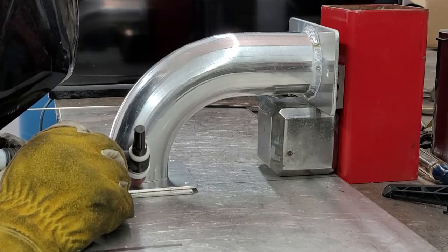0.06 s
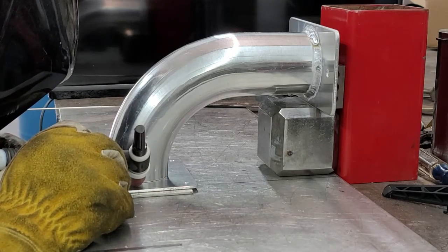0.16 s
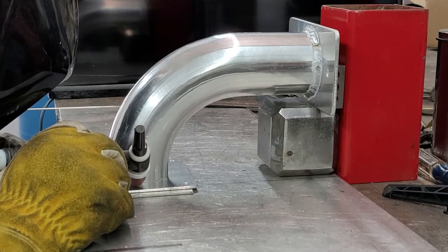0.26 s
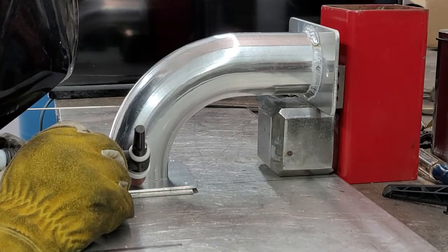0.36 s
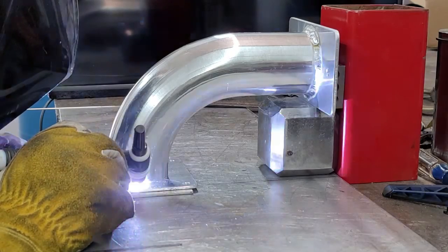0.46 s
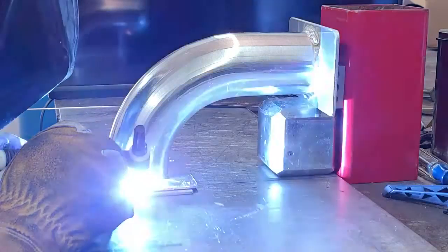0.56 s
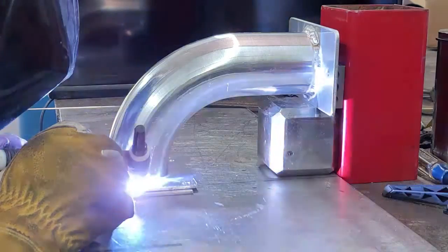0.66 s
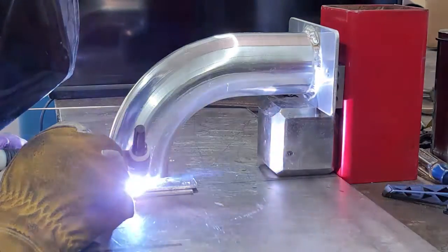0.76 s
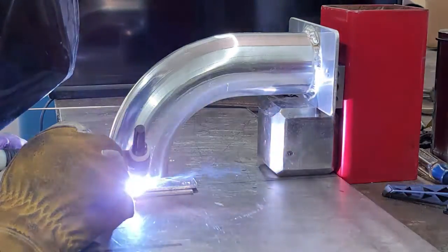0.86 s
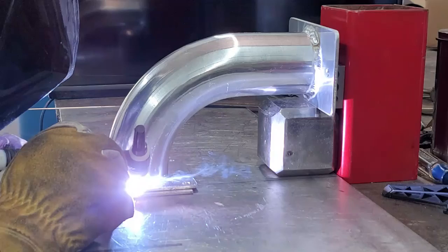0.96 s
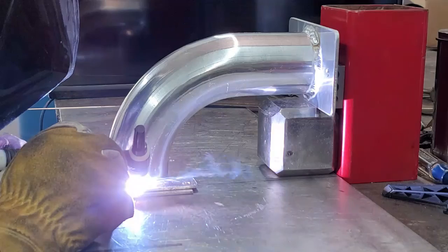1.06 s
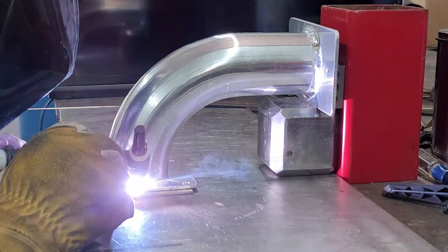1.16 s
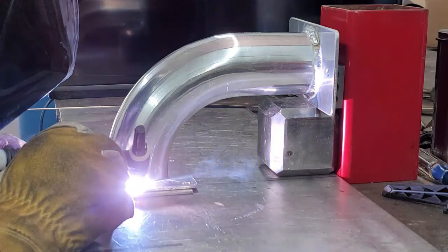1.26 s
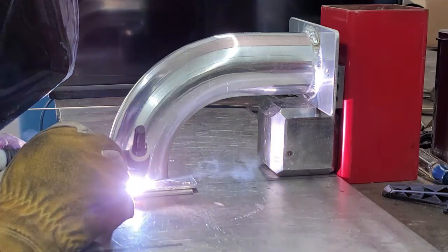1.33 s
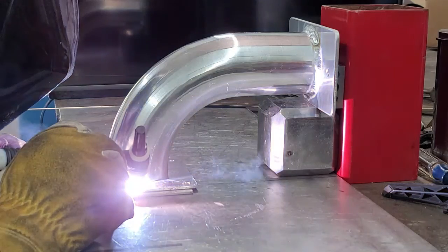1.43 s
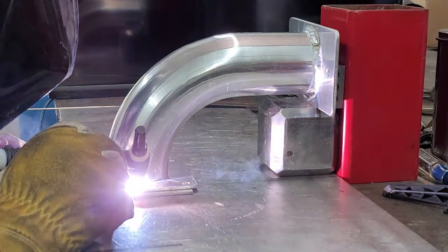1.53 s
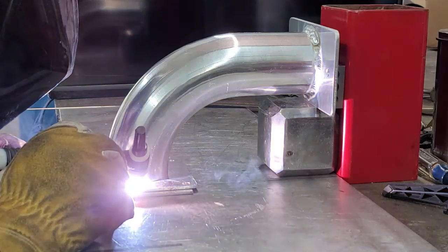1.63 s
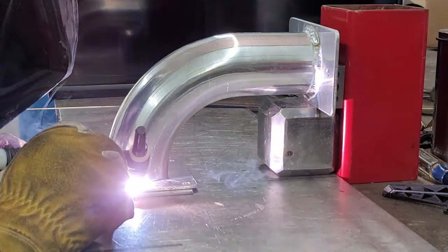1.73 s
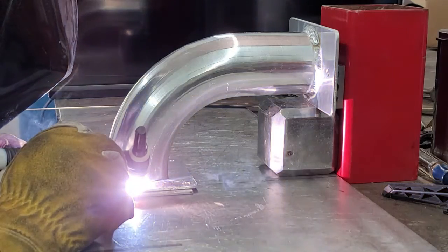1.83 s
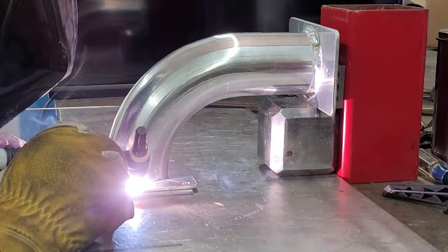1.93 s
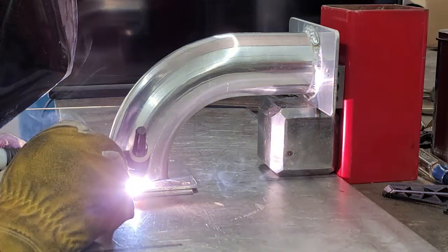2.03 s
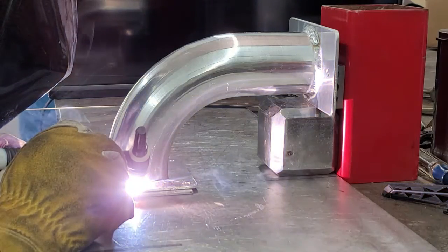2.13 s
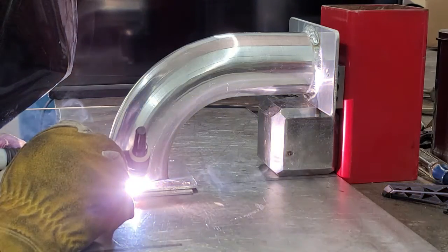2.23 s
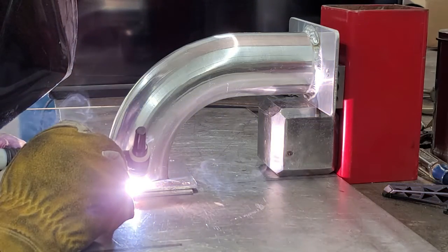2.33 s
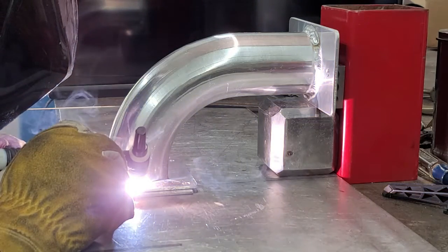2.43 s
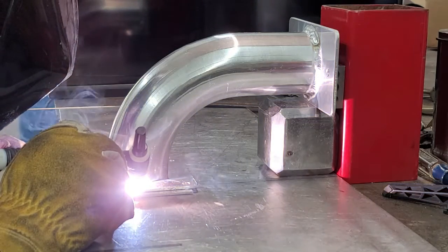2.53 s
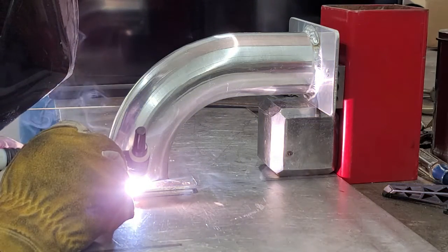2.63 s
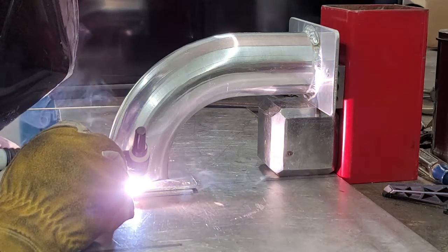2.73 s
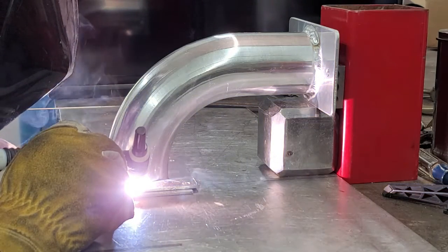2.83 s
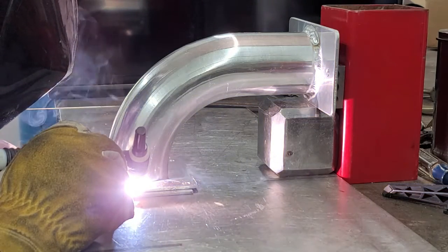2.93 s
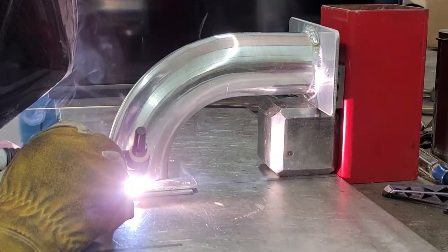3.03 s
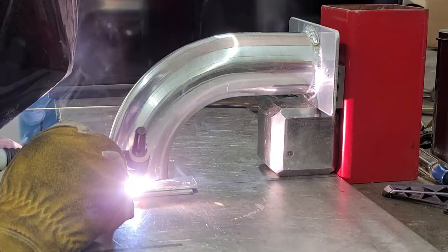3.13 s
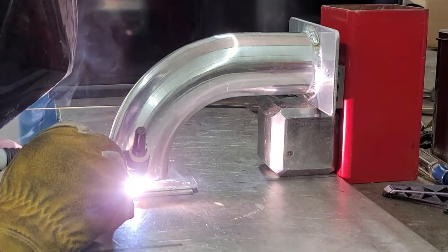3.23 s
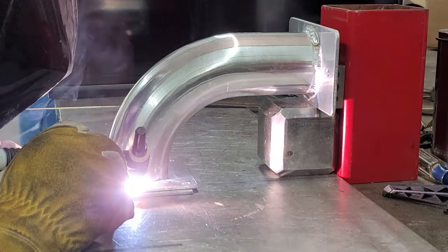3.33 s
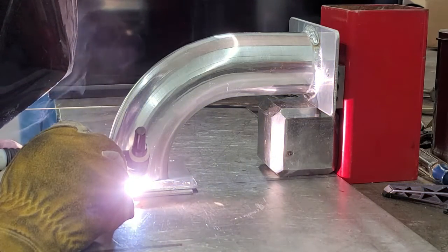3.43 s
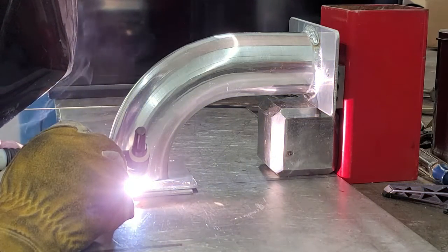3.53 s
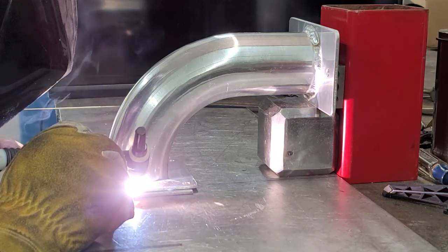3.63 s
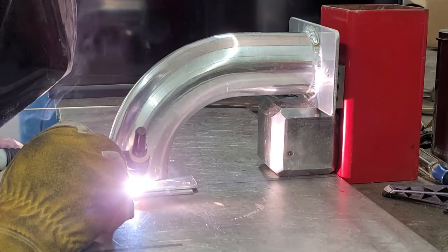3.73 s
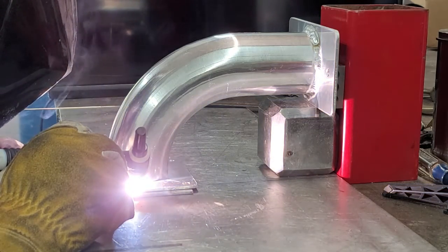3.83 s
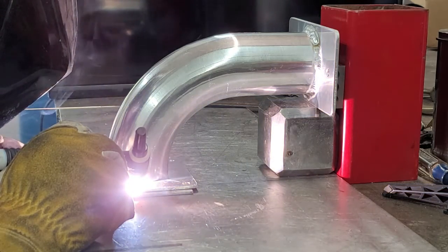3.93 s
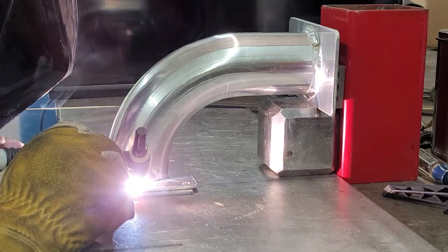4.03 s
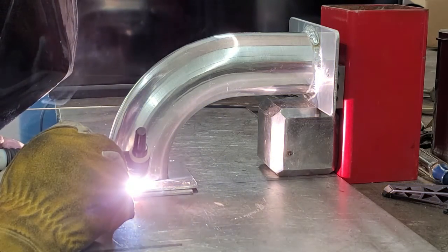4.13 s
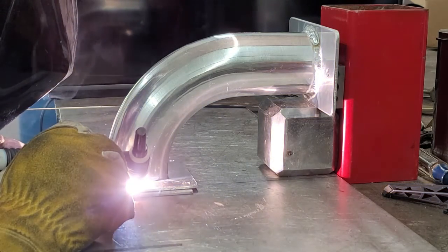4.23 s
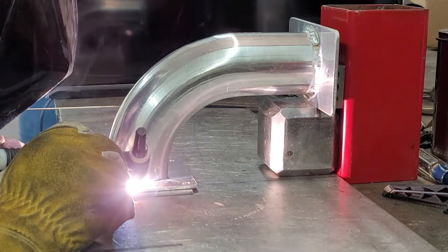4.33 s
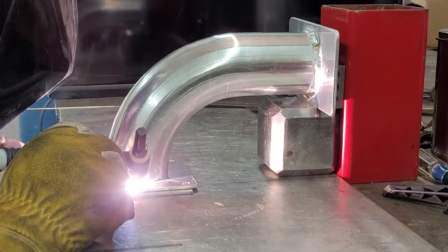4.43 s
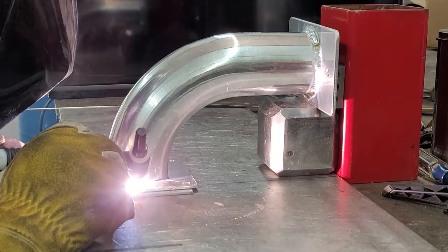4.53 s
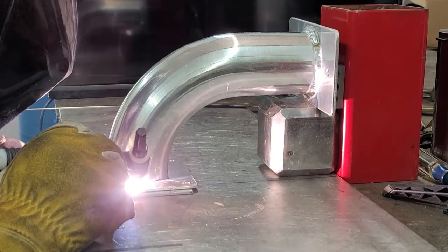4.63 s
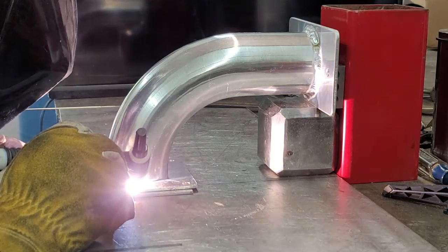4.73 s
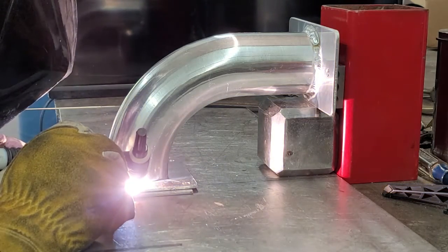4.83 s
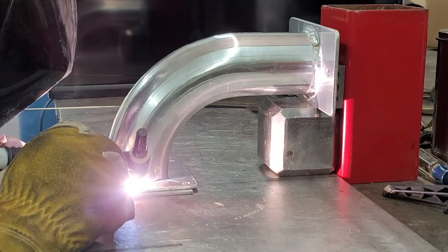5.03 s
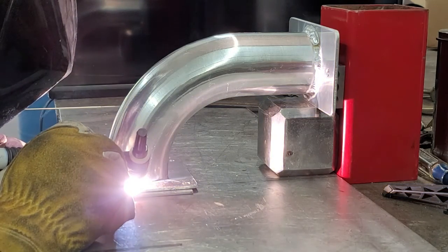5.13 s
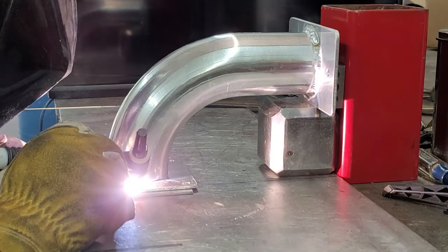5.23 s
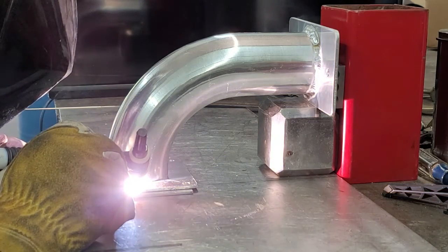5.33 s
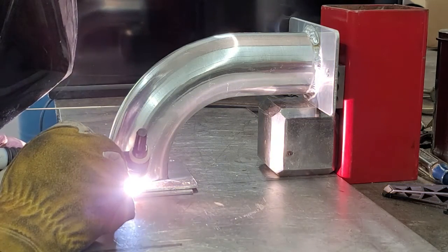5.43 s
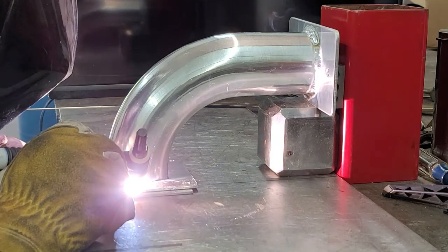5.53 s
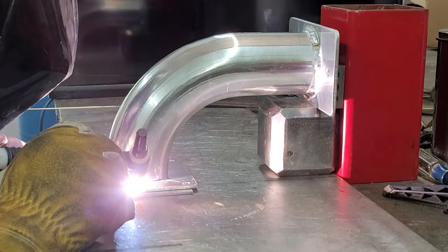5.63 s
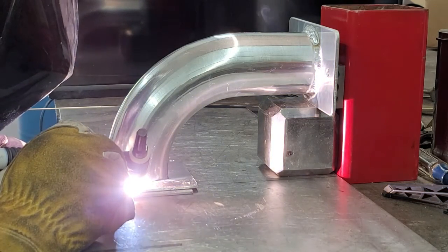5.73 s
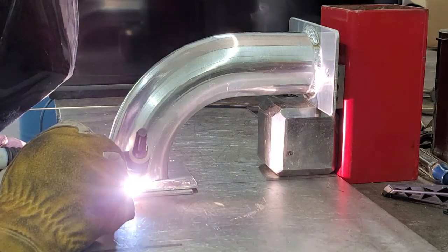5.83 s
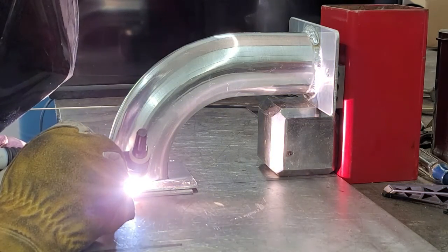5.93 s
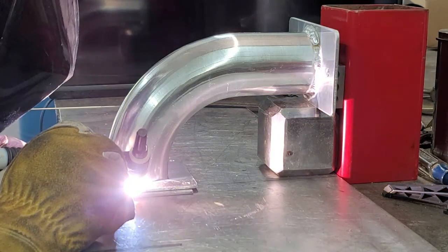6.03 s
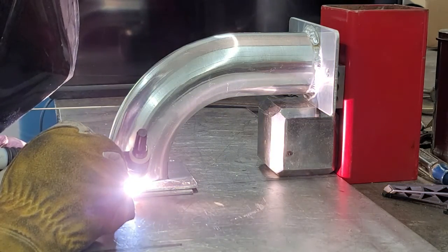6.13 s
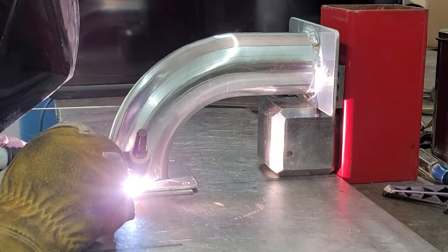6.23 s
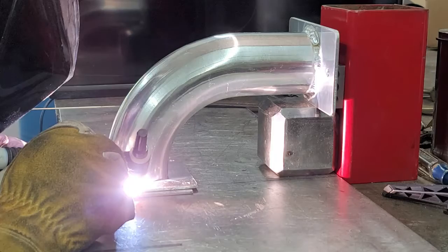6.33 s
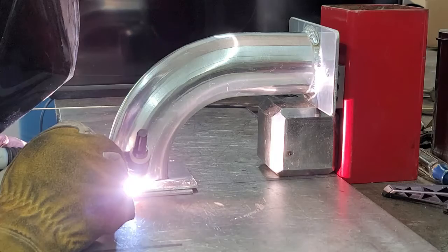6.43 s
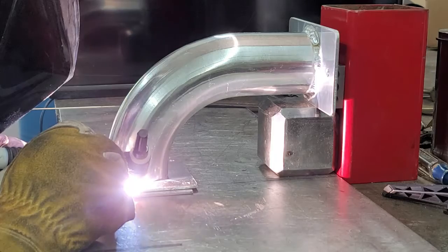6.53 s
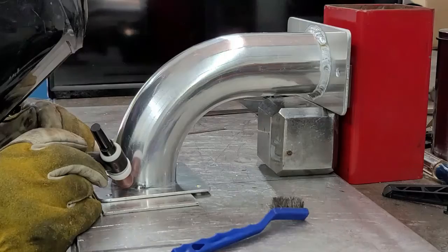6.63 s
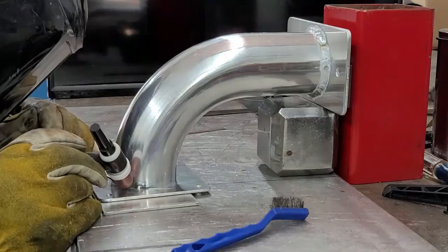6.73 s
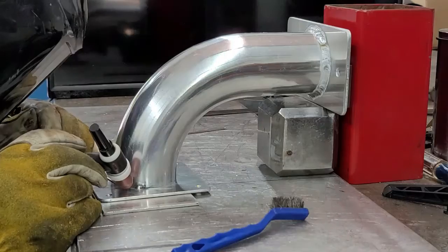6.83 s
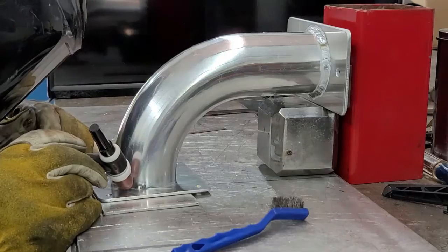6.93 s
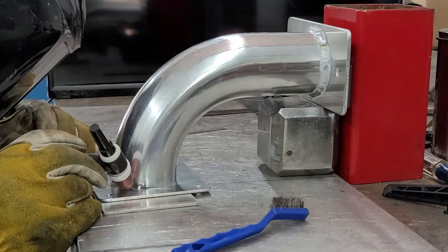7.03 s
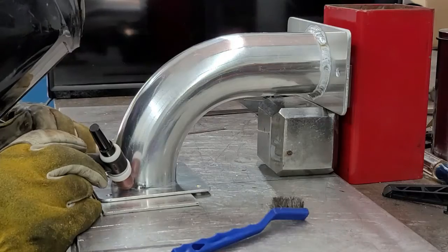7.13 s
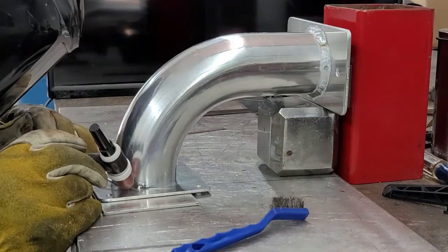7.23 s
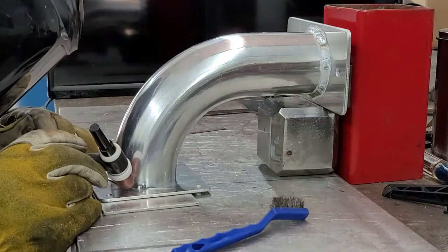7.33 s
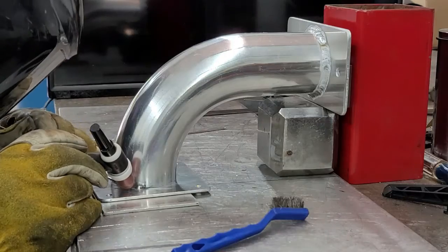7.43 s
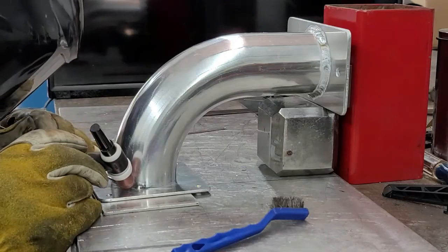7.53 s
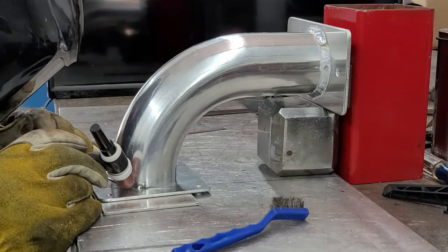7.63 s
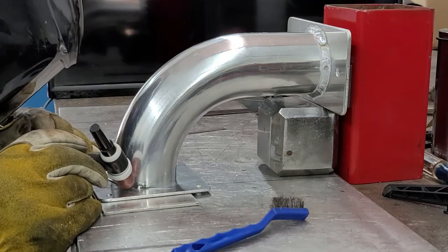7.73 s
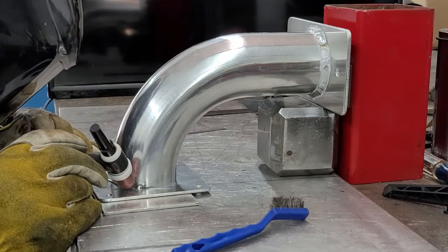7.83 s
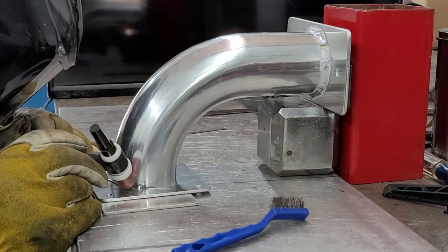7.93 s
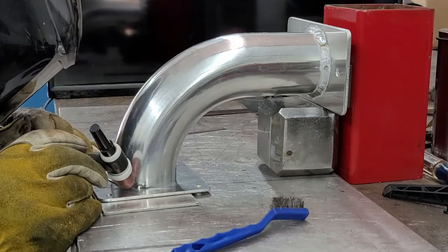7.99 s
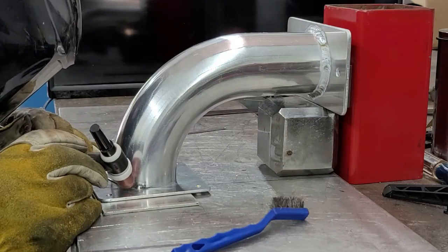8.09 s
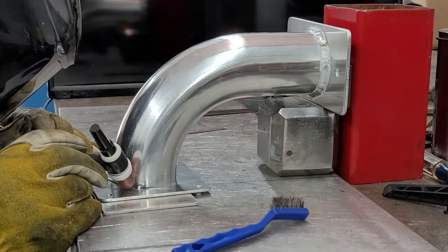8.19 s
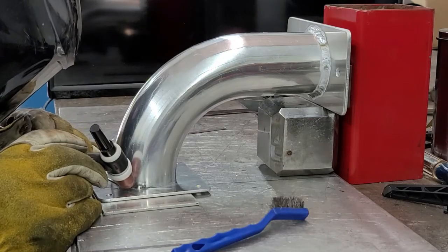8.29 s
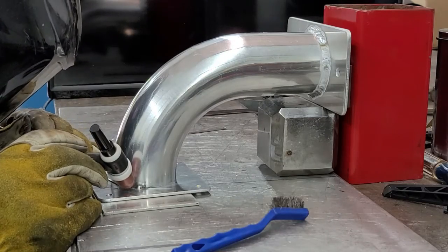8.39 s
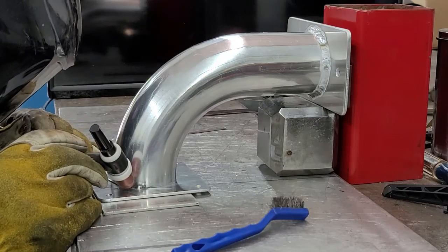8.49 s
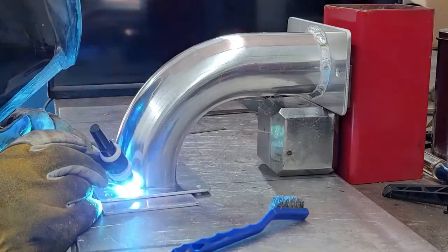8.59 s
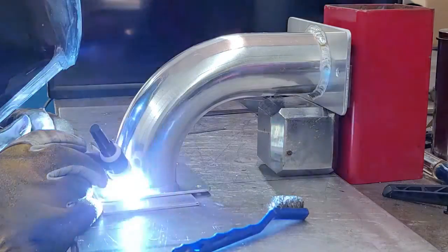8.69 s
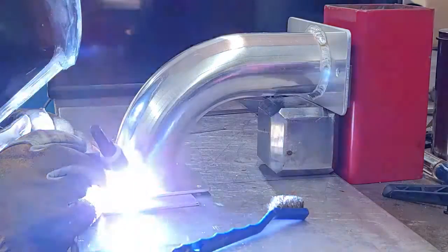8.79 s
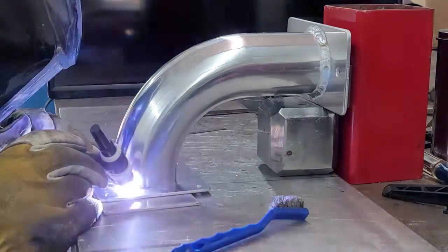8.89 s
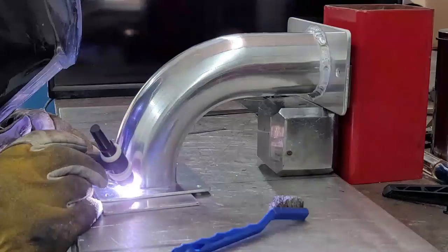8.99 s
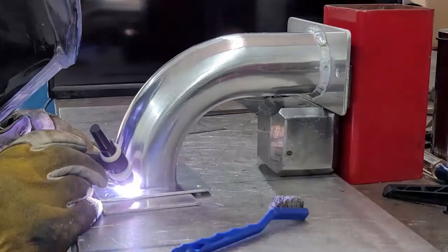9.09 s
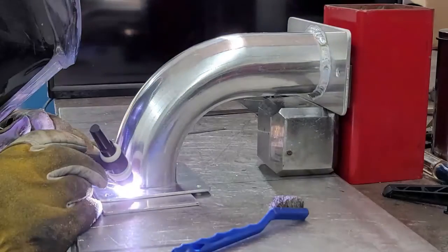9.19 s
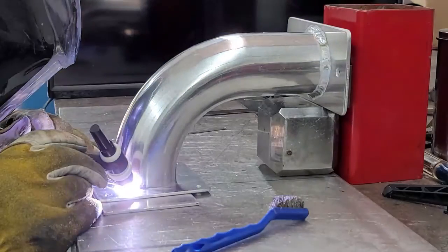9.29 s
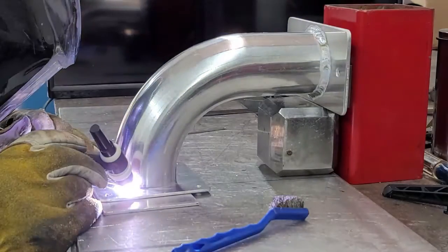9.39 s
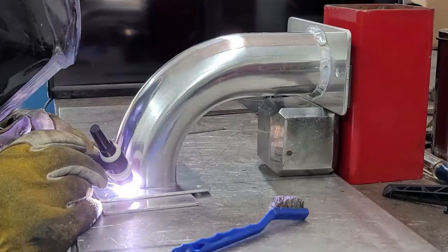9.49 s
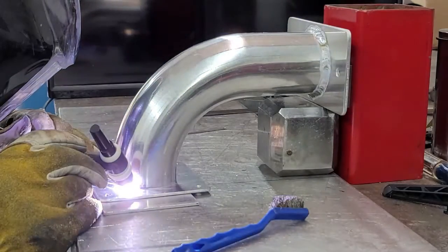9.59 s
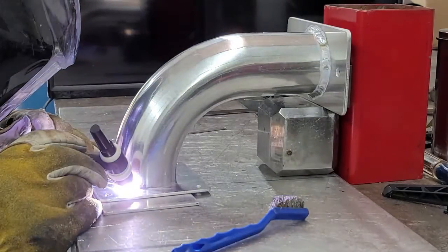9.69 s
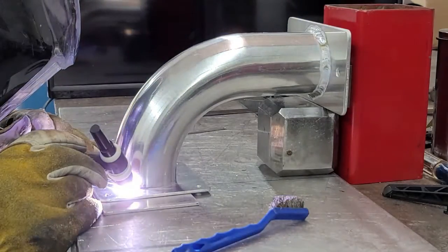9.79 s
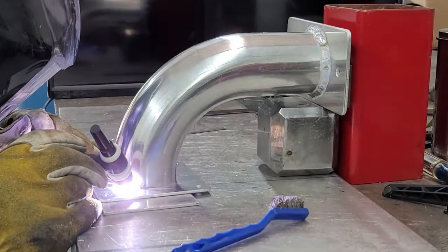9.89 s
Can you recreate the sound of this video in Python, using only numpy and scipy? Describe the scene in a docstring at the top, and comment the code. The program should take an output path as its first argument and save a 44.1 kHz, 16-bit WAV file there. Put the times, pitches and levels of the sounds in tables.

```python
"""Metal shop, at the bench: an AC welding arc, struck twice. A trigger clicks, the gas valve clacks,
the arc crackles alight, then snaps at both current reversals of each cycle; bench and pipe echo it.
A vehicle drones past outside. At 6.7 s weld and drone cut off; cooling metal ticks in the quiet shop
before the second strike."""
import sys
import numpy as np
from scipy import signal
from scipy.fft import rfft, irfft, next_fast_len
from scipy.io import wavfile
from scipy.ndimage import uniform_filter1d

SR = 44100
rng = np.random.default_rng(int(sys.argv[2]) if len(sys.argv) > 2 else 0)


def wav_out(sig):
    """Save sig, one row per channel (or a flat mono array), as 16-bit PCM at SR to the path in sys.argv[1]."""
    wavfile.write(sys.argv[1], SR, np.round(np.clip(np.atleast_2d(sig).T, -1, 1) * 32767).astype(np.int16))


N = 438794

# quiet shop spectrum: freq_hz, gain_db
ROOM_EQ = [(55, -32.5), (105, 0.5), (184, -8.5), (300, -17.5), (440, -22.5), (1040, -24.5), (2100, -36),
           (4000, -44), (7200, -48), (9000, -54), (16000, -51)]
# brief hums: start_s, end_s, pitch_hz, level_db
HUMS = [(2.593, 4.05, 187.5, -55), (2.7, 4.1, 154.3, -57)]
# traffic rumble: time_s, level_db
RUMBLE = [(0, -47), (.3, -37), (.75, -41.5), (2.5, -48), (5.1, -44), (6.68, -46), (6.72, -55), (8.35, -59),
          (8.65, -48), (8.9, -53.5), (9.95, -61)]
# traffic noise: time_s, murmur_db, road_db
ROAD = [(0, -46.5, -67), (.4, -45.5, -71), (.8, -67, -74), (2.5, -59.5, -72), (2.9, -56.5, -77),
        (4.3, -64, -65.5), (5.9, -56.5, -62.5), (6.55, -52.5, -50), (6.68, -52.5, -64)]
# engine pitch: time_s, pitch_hz
ENGINE_PITCH = [(0, 135), (.46, 130), (.6, 113), (1.6, 104), (2.4, 113), (4.3, 112), (5.3, 106), (5.6, 94),
                (6.2, 92), (6.67, 85)]
# engine level: time_s, level_db
ENGINE_LEVEL = [(0, -46), (.25, -35.5), (.46, -45.5), (.59, -36.5), (.7, -43), (1.49, -41), (1.75, -58),
                (2.5, -46), (3.83, -54), (4.14, -34), (4.38, -42.5), (4.6, -55.5), (4.85, -51), (5.1, -37),
                (5.3, -43.5), (5.55, -31), (5.8, -37), (6.67, -39)]
# cooling ticks: start_s, level_db, treble_tilt_db
TICKS = [(6.967, -72, 5), (7.036, -56, -7), (7.32, -57, 9), (7.662, -76.5, 9)]
# modes of the cooling metal: freq_hz, gain_db, t60_s
METAL_MODES = [(1500, 6, 0.061), (2440, -3, 0.15), (4630, -2, 0.061), (5300, 1, .18), (6700, 7.5, 0.077),
               (7240, -1, 0.17), (9500, -7, .15), (11900, -9.5, .06)]
# weld starts: trigger_s, trigger_db, valve_s, valve_db, gas_db
STARTS = [(0.07, -41.5, .11, -22, -30.5), (8.2083, -48, 8.252, -29.5, -37.5)]
# gas hiss spectrum: freq_hz, gain_db
GAS_EQ = [(290, -46.5), (500, -9), (974, -14), (1740, -3), (2330, -11.5), (3020, -9.5), (4470, -14),
          (7100, -8), (10100, -21.5), (12100, -13.5), (16000, -32.5)]
# starting arc hiss: start_s, level_db, rise_db_per_s
PILOT = [(0.523, -43, 15), (8.665, -33, 10)]
# sputter bursts: start_s, length_s, level_db, low_band_gain_db
SPUTTER = [(.522, 0.02, -14.5, -9), (0.542, .032, -21, -13), (.575, .069, -30, -18),
           (8.677, 0.014, -34, -15), (8.719, 0.013, -28, -14), (8.739, 0.01, -27.5, -7.5),
           (8.76, .11, -42.5, -33)]
# crackle spectrum: freq_hz, gain_db
CRACKLE_EQ = [(180, -64.5), (300, -34.5), (379, -17.5), (961, -24), (1060, -15), (1170, -19.5), (1640, -4),
              (3580, 1.5), (4300, -7), (7320, 1.5), (16000, -15.5)]
# single sparks: start_s, level_db
SPARKS = [(0.521, -1), (.537, -1.5), (.549, -6), (0.554, -8), (0.562, -4), (.772, -11), (8.666, -12),
          (8.729, -22), (8.748, -22)]
# pipe ring: freq_hz, gain_db, t60_ms
PIPE_MODES = [(637, -33, 73), (843, -42, 21), (1300, -35.5, 33), (1670, -30, 14.5), (2797, -27, 13.1),
              (3280, -31, 6.9), (3685, -31.5, 13), (4054, -31, 10), (5690, -34, 12), (6380, -30.5, 7.4),
              (7290, -25, 9.4)]
# torch-pipe bounces, per position and ear: round_trip_ms, first_gain, further_gain
FLUTTER = [
    [(.27, .5, 0.54), (.3, 0.33, 0.53)],
    [(.26, 0.27, .5), (.34, 0.18, .5)],
    [(0.283, 0.87, 0.2), (0.215, 0.37, .7)],
]
# bench echo, per ear: delay_ms, gain
BENCH_ECHO = [(.76, 0.14), (1.142, 0.22)]
# torch positions: start_s, body_db, bite_db, air_db, left_minus_right_db
TORCH = [(.7, 0.5, 0.3, -4.5, 0.8), (5.29, 7, 2.85, -4, 1), (8.8, -5, 6.5, 0.5, -1.5)]
# arc burning: start_s, end_s
WELDS = [(.762, 6.677), (8.905, 10)]
# place of the second reversal in the cycle: time_s, lag_ms
REVERSAL_LAG = [(.86, 3.59), (.9, 3.68), (5.28, 3.58), (5.5, 4.38), (6.7, 4.36), (9.01, 7.49), (9.04, 7.62)]
# arc levels, per weld: time_s, level_db, sizzle_gain_db
ARC_LEVELS = [
    [(.76, -24, -7.5), (1.3, -24, -5.5), (5.3, -25.5, -4), (6.68, -25, -4)],
    [(8.9, -27.5, -8), (9.95, -28.5, -1)],
]
# arc spectrum: freq_hz, gain_db
ARC_EQ = [(200, -41), (400, -30.5), (700, -17.5), (1100, -12), (1700, -1.5), (2700, -1), (3700, 0.5),
          (4600, -1.5), (6900, -1), (8000, -6), (9500, -11), (11800, -5.5), (14500, -1.5), (16000, -5.5)]
# sizzle spectrum relative to the snaps: freq_hz, gain_db
SIZZLE_EQ = [(300, 12.5), (1000, -2), (2500, 2), (4500, 0), (7000, 3), (9000, 14), (12000, 7.5),
             (15500, -3.5)]
# stereo side gain: freq_hz, gain_db
SIDE_EQ = [(100, -1), (500, -3), (2000, 2.5), (6000, 3.5), (12000, -2)]

CUT_S = WELDS[0][1]
t = np.arange(N) / SR


def undb(db):
    return 10 ** (np.asarray(db) / 20)


def unit(x):
    return x / np.sqrt(np.mean(x ** 2))


def decay(age_s, t60_s):
    return 1000 ** (-age_s / t60_s)


def curves_db(*tables):
    """Level columns over time, silent outside the tables."""
    out = np.full((len(tables[0][0]) - 1, N), -200.)
    for time_s, *columns in map(np.transpose, tables):
        on = (t >= time_s[0] - .04) & (t <= time_s[-1] + .04)
        out[:, on] = [np.interp(t[on], time_s, column) for column in columns]
    return out


def eq(x, points):
    """Zero-phase filter through (freq_hz, gain_db) points."""
    hz, db = np.transpose(points)
    size = next_fast_len(x.shape[-1])
    bins_hz = np.arange(size // 2 + 1) * SR / size + 1
    gain = undb(np.interp(np.log(bins_hz), np.log(hz), db))
    return irfft(rfft(x, size) * gain, size)[..., :x.shape[-1]]


def band(x, lo_hz, hi_hz):
    return signal.sosfilt(signal.butter(2, [lo_hz, hi_hz], "band", fs=SR, output="sos"), x)


def stereo_noise(correlation, size=N):
    mid, side = rng.standard_normal((2, size))
    return np.sqrt((1 + correlation) / 2) * mid + np.sqrt((1 - correlation) / 2) * side * [[1], [-1]]


def drift(rate_hz):
    """Smooth noise, spread near 1."""
    hold = int(SR / rate_hz)
    steps = np.repeat(rng.standard_normal(N // hold + 1), hold)
    return 1.6 * uniform_filter1d(uniform_filter1d(steps, hold), hold)[:N]


def tone(hz):
    return np.sqrt(2) * np.sin(2 * np.pi * np.cumsum(hz) / SR)


def add(out, x, start_s=0):
    i = int(start_s * SR)
    out[..., i:i + x.shape[-1]] += x[..., :out.shape[-1] - i]


def impulses(times_s, gains):
    """Windowed sincs at fractional samples."""
    at = times_s[:, None] * SR
    taps = np.floor(at) + np.arange(-8, 9)
    gap = taps - at
    out = np.zeros(int(taps.max()) + 1)
    np.add.at(out, taps.astype(int), np.sinc(gap) * np.cos(np.pi * gap / 18) ** 2 * gains[:, None])
    return out


def room_tone():
    """Two brief hums, a wavering hum after the cut, steady shop noise."""
    out = np.zeros(N)
    for start_s, end_s, hz, db in HUMS:
        swell = np.clip(np.minimum(t - start_s, end_s - t) / .034, 0, 1)
        out += np.sin(2 * np.pi * hz * t) * swell * undb(db + 1.9 * drift(1.76))
    hum = tone(hz=58 * (1 + .0411 * drift(4.5)))
    out += hum * (t > CUT_S) * undb(-49.5 - 1.5 * (t - CUT_S) + 1.7 * drift(6))
    low = eq(stereo_noise(.93), ROOM_EQ[:4] + [(600, -93.5)])
    high = eq(stereo_noise(.1), [(150, -72.5)] + ROOM_EQ[3:])
    return out + unit(low + high) * undb(-59.5)


def traffic():
    """Rumble, murmur and road noise from outside."""
    murmur_db, road_db = curves_db(ROAD)
    rumble = unit(band(band(stereo_noise(.86), 50.14, 73), 33, 160))
    rumble *= undb(curves_db(RUMBLE)[0] + 1.4 * drift(3))
    murmur = unit(band(stereo_noise(.3), 120, 210)) * undb(murmur_db + 1.7 * drift(3))
    road = unit(band(stereo_noise(.61), 450, 780)) * undb(road_db + 2 * drift(12))
    return rumble + murmur + road


def vehicle():
    """Engine drone, falling in pitch as it passes."""
    hz = np.interp(t, *np.transpose(ENGINE_PITCH)) * (1 + .01 * drift(6.4))
    drone = tone(hz) * undb(curves_db(ENGINE_LEVEL)[0] + drift(15))
    return drone * (t < CUT_S) * undb([[.2], [-.2]])


def cooling_ticks():
    """Cooling metal rings briefly on its modes."""
    out, age_s = np.zeros((2, N)), t[:SR // 2]
    for start_s, level_db, tilt_db in TICKS:
        ring = 2.1 * band(stereo_noise(.3, len(age_s)), 2500 * undb(tilt_db / 3), 15000)
        ring *= decay(age_s, .079)
        for hz, db, t60_s in METAL_MODES:
            rough = unit(band(stereo_noise(.5, len(age_s)), 5, 117.5))
            gain = undb(db + tilt_db * np.tanh(np.log2(hz / 5900) * 6))
            ring += gain * rough * np.sin(2 * np.pi * hz * age_s) * decay(age_s, t60_s)
        add(out, .28 * ring * np.minimum(age_s / .0017, 1) * undb(level_db), start_s)
    return out


def clack(hz, t60_s, level_db):
    """Knock: narrow noise core, wide skirt."""
    age_s = t[:SR // 2]
    core = unit(band(stereo_noise(.85, len(age_s)), hz / 1.35, hz * 1.3))
    skirt = unit(band(stereo_noise(.44, len(age_s)), hz / 7.3, min(hz * 5, 15000)))
    envelope = np.minimum(age_s / .0014, 1) * decay(age_s, t60_s)
    return (.58 * core + .31 * skirt) * envelope * undb(level_db)


def trigger_and_gas():
    """Trigger click, valve clack, gas hiss until the strike."""
    out = np.zeros((2, N))
    gas = unit(eq(stereo_noise(.22), GAS_EQ)) * undb(drift(36))
    for (trigger_s, trigger_db, valve_s, valve_db, gas_db), (strike_s, *_) in zip(STARTS, PILOT):
        age_s = t[:int((strike_s - valve_s) * SR)]
        flow = decay(age_s, .088) + undb(-8.5) * decay(age_s, .99) + undb(-26)  # puff, ebb, steady
        add(out, gas[:, int(valve_s * SR):][:, :len(age_s)] * flow * undb(gas_db), valve_s)
        add(out, clack(hz=4480, t60_s=.21, level_db=trigger_db), trigger_s)
        add(out, clack(hz=1440, t60_s=.28, level_db=valve_db), valve_s)
    return out


def ignition(pilot_low_db=-26.5, sag_db=5.5, edge_s=.0015):
    """The starting arc hisses and sputters before it settles."""
    crackle_gain, low_gain = np.zeros((2, N))
    for (start_s, db, rise_db_per_s), (lit_s, _) in zip(PILOT, WELDS):
        envelope = undb(db + rise_db_per_s * (t - start_s)) * ((t >= start_s) & (t < lit_s))
        crackle_gain += envelope
        low_gain += envelope * undb(pilot_low_db)
    for start_s, length_s, db, low_db in SPUTTER:
        age_s = t - start_s
        gate = np.clip(np.minimum(age_s, length_s - age_s) / edge_s + 1, 0, 1) * (t >= PILOT[0][0])
        envelope = gate * undb(db - sag_db * np.clip(age_s / length_s, 0, 1))
        crackle_gain += envelope
        low_gain += envelope * undb(low_db)
    grain = stereo_noise(.51) * undb(.79 * drift(300))
    return unit(eq(grain, CRACKLE_EQ)) * crackle_gain + unit(band(grain, 400, 2900)) * low_gain


def sparks(tau_s=.0025):
    """Each spark: an impulse with a short noise tail."""
    out, age_s = np.zeros((2, N)), t[:SR // 20]
    for start_s, level_db in SPARKS:
        burst = .48 * stereo_noise(.71, len(age_s)) * np.exp(-age_s / tau_s)
        burst[:, 0] += 2.3
        add(out, band(burst, 700, 7000) * undb(level_db), start_s)
    return out


def snap_response(flutter, shared_noise, own_share=.45, ear_lag_ms=.027):
    """Stereo impulse response: shop, nearby clutter, far slap, pipe ring, direct snap and bounces."""
    size = shared_noise.shape[1]
    age_s = t[:size]
    diffuse = np.sqrt(1 - own_share) * shared_noise + np.sqrt(own_share) * stereo_noise(1, size)
    shop = unit(diffuse * decay(age_s, .056) * (age_s > .0008)) * undb(-3)
    clutter = band(stereo_noise(.92, size) * [[1], [-1.2]], 10800, 14800)  # mostly antiphase
    out = shop + unit(clutter * decay(age_s, .012))
    slap = band(shared_noise * [[1], [-.6]], 4100, 18400) * decay(age_s, .024)
    add(out, unit(slap) * undb(-16.5), start_s=.0039)
    out /= np.sqrt(size)
    for hz, db, t60_ms in PIPE_MODES:
        out += undb(db) * np.sin(2 * np.pi * hz * age_s) * decay(age_s, t60_ms / 1000)
    bounce = np.arange(6)
    for ear, ((trip_ms, first, further), (bench_ms, bench_gain)) in enumerate(zip(flutter, BENCH_ECHO)):
        delays_ms = np.append(trip_ms * bounce, bench_ms) + ear * ear_lag_ms
        gains = np.concatenate([[1], first * further ** bounce[:-1], [bench_gain]])
        add(out[ear], impulses(delays_ms / 1000 + 10 / SR, gains)[10:])
    return out


def torch_echoes(sources, move_s=.03):
    """Each source takes its own path through the shop; paths crossfade as the torch moves."""
    position = sum(np.clip((t - start_s) / move_s, 0, 1) for start_s, *_ in TORCH[1:])
    shared_noise = stereo_noise(.9, SR // 8)
    out = np.zeros((2, N))
    for k, (flutter, (_, body_db, bite_db, air_db, pan_db)) in enumerate(zip(FLUTTER, TORCH)):
        share = np.clip(1 - np.abs(position - k), 0, 1)
        heard = np.zeros((2, N))
        for source in sources:
            add(heard, signal.oaconvolve(source * share, snap_response(flutter, shared_noise), axes=1))
        timbre = [(900, body_db), (2100, .0042), (3200, bite_db), (4600, 0), (7000, .0018),
                  (10000, air_db)]
        out += eq(heard * undb([[pan_db / 2], [-pan_db / 2]]), timbre)
    return out


def stirred_air(snaps, tau_s=.0062):
    """Hot air and hands stir the field: part of each snap returns differently over time."""
    size = SR // 40
    tail = unit(stereo_noise(.3, size) * np.exp(-t[:size] / tau_s)) / np.sqrt(size)
    return signal.oaconvolve((snaps.sum(axis=0) * drift(9))[None], tail, axes=1)[:, :N]


def sizzle(flare, level_db):
    """Hiss that flares after each snap."""
    return unit(eq(stereo_noise(.52) * flare, SIZZLE_EQ)) * undb(level_db)


def direct_sizzle(flare, level_db):
    """Arc sizzle heard directly, without echoes, flaring after each snap."""
    return unit(eq(stereo_noise(.42) * flare, SIZZLE_EQ)) * undb(level_db)


def reversals(sizzle_db, arc_hz=100, gap_cycles=.25, first_db=-3, flare_tau_s=.0011):
    """One snap train per current reversal, and the flare envelope that follows the snaps."""
    cycle_s = np.arange(1, N / SR * arc_hz) / arc_hz
    lag_s = np.interp(cycle_s, *np.transpose(REVERSAL_LAG)) / 1000
    stumble_s = np.gradient(lag_s) * rng.standard_normal(len(lag_s))  # while the lag slides
    second_s = cycle_s + lag_s + stumble_s
    times_s = np.array([second_s - gap_cycles / arc_hz, second_s])
    at = np.minimum(times_s * SR, N - 1).astype(int)
    # the arc root wanders, more when it sizzles
    times_s += 6e-6 * drift(14)[at] + 8e-6 * undb(.4 * sizzle_db[at]) * rng.standard_normal(at.shape)
    gains = undb(.61 * rng.standard_normal(at.shape) + [[first_db], [0]])
    snaps, kicks = np.zeros((2, N)), np.zeros(N)
    for train, train_s, train_gains in zip(snaps, times_s, gains):
        add(train, impulses(train_s, train_gains))
    kicks[at] = undb(1.88 * rng.standard_normal(at.shape))
    flare = .58 + .5 * signal.lfilter([1], [1, -np.exp(-1 / (flare_tau_s * SR))], kicks)
    return unit(snaps) / np.sqrt(2), flare


def arc():
    """One reversal snaps at the electrode, the other at the pool, where the arc root sizzles."""
    level_db, sizzle_db = curves_db(*ARC_LEVELS)
    lit = sum((t >= start_s) & (t < end_s) for start_s, end_s in WELDS)
    snaps, flare = reversals(sizzle_db)
    electrode = snaps[:1]
    pool = snaps[1] + sizzle(flare, sizzle_db - 2.5) + undb(-11.5) * stirred_air(snaps)
    out = direct_sizzle(flare, sizzle_db - 2) * lit + torch_echoes([electrode * lit, pool * lit])
    out *= np.clip(1 - (t - CUT_S) / .022, 0, 1) ** 2 + (t > WELDS[1][0])  # cut the first weld's tail
    return unit(eq(out, ARC_EQ)) * undb(level_db)


def scene():
    welding = arc() + ignition() + sparks() + trigger_and_gas()
    return welding + cooling_ticks() + vehicle() + traffic() + room_tone()


def record(dry, low_cut_hz=25, high_cut_hz=15750):
    """Widen the treble, cut the deepest bass and the top."""
    mid = (dry[0] + dry[1]) / 2
    side = eq((dry[0] - dry[1]) / 2, SIDE_EQ)
    wide = [mid + side, mid - side]
    x = signal.sosfilt(signal.butter(2, low_cut_hz, "high", fs=SR, output="sos"), wide)
    return signal.sosfilt(signal.ellip(12, .2, 85, high_cut_hz, fs=SR, output="sos"), x)


dry = scene()
out = record(dry)
wav_out(out)
```